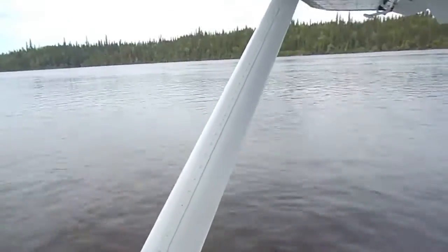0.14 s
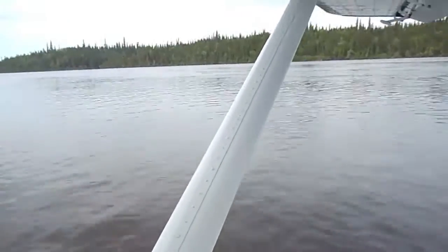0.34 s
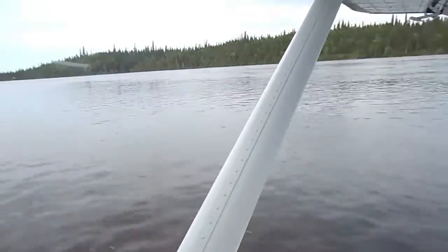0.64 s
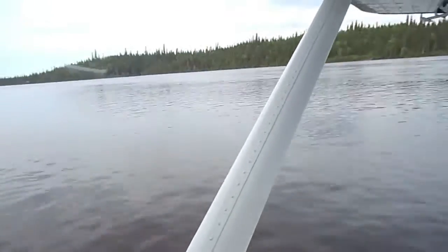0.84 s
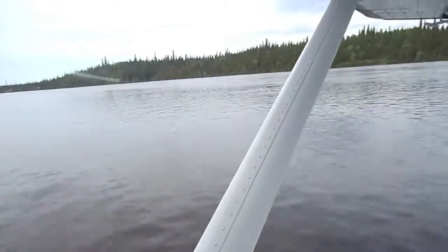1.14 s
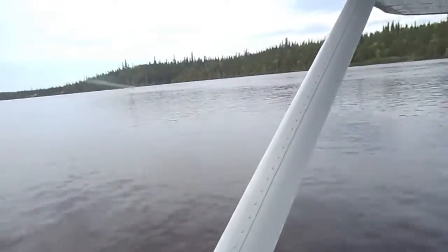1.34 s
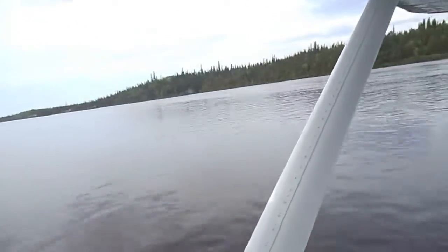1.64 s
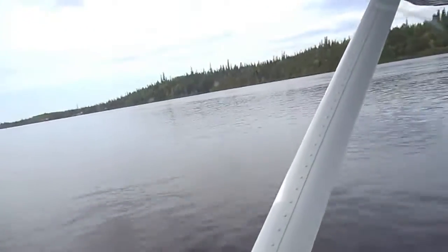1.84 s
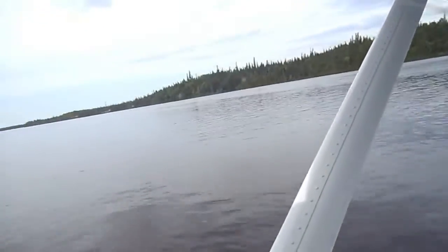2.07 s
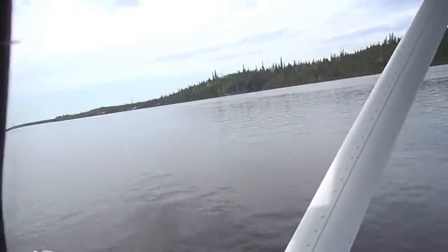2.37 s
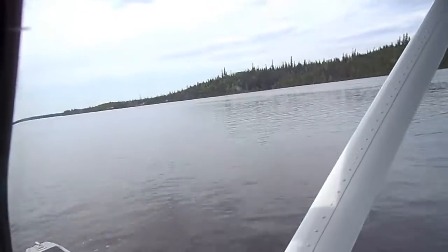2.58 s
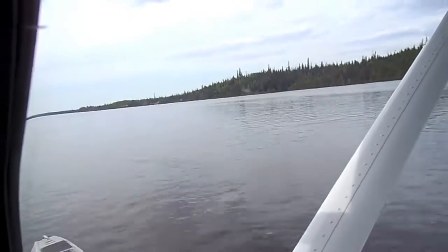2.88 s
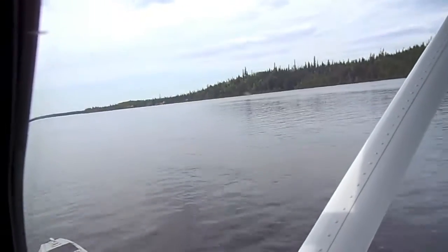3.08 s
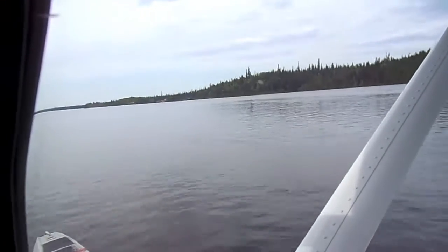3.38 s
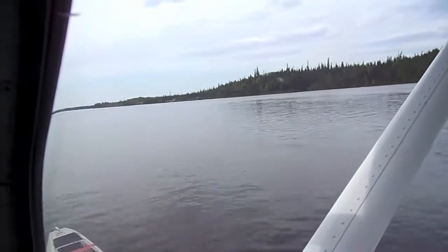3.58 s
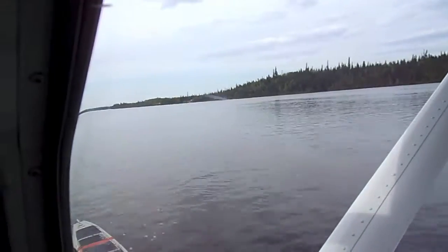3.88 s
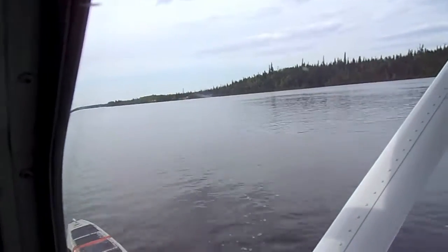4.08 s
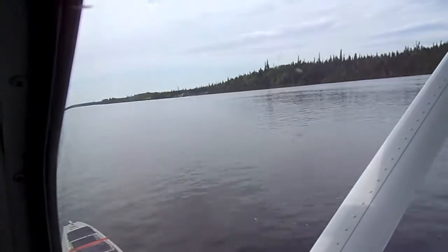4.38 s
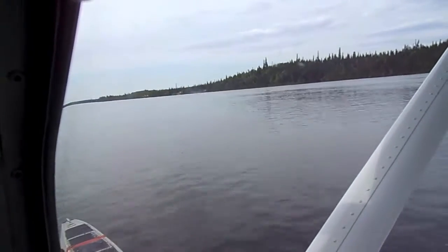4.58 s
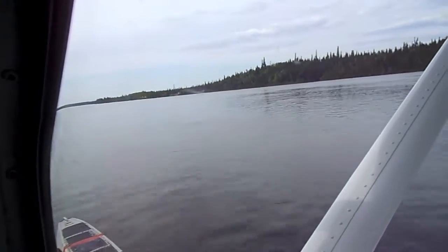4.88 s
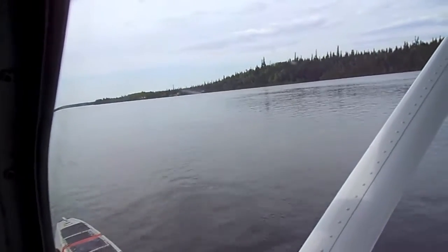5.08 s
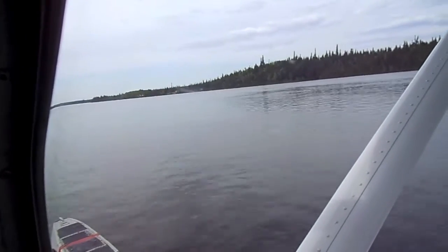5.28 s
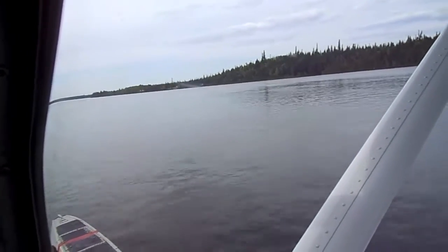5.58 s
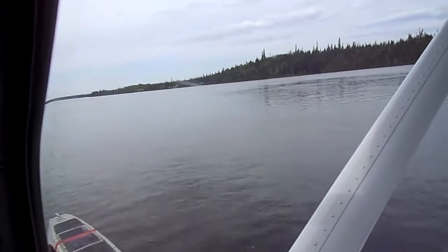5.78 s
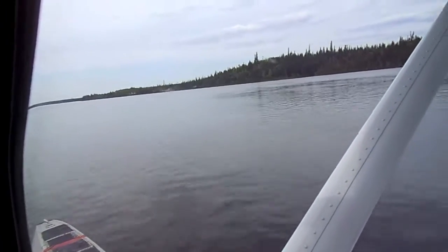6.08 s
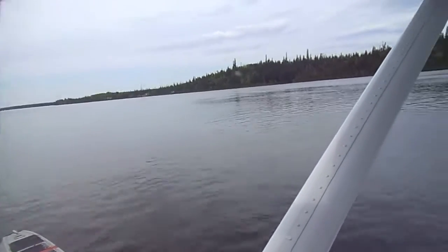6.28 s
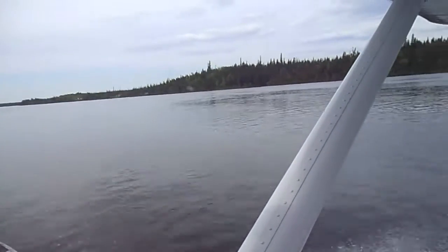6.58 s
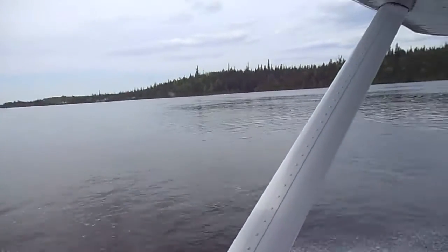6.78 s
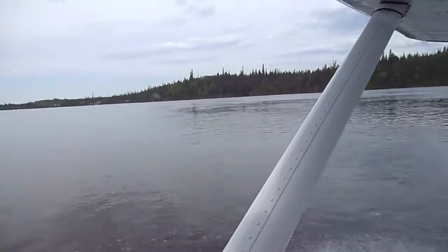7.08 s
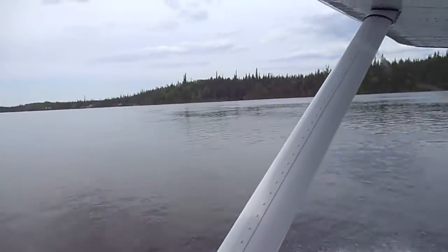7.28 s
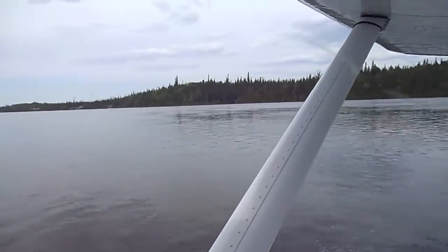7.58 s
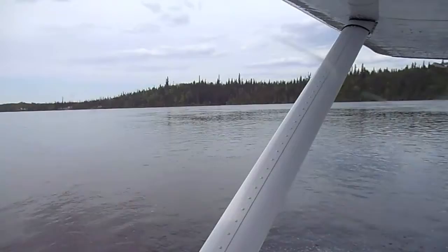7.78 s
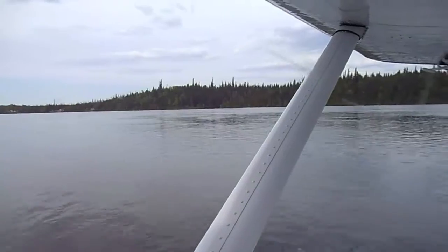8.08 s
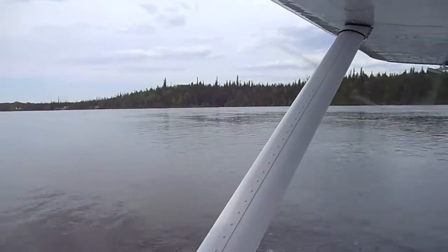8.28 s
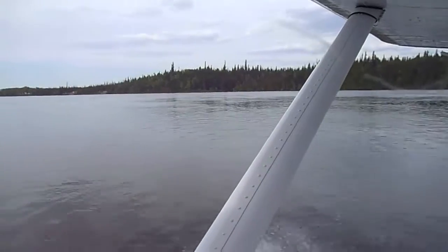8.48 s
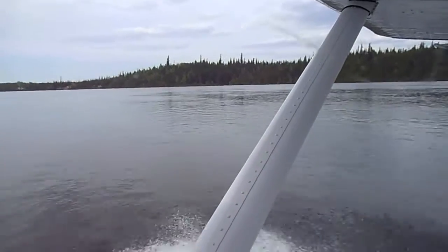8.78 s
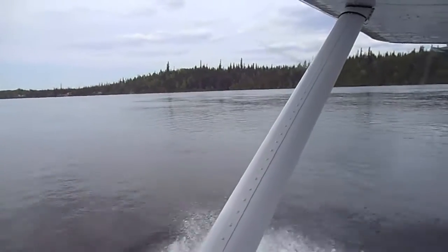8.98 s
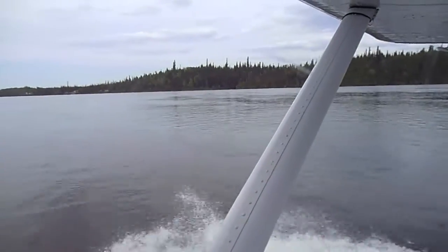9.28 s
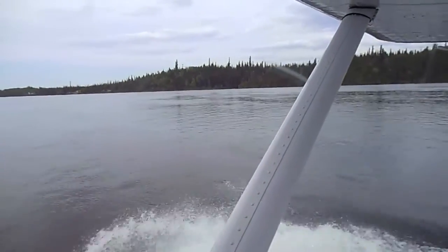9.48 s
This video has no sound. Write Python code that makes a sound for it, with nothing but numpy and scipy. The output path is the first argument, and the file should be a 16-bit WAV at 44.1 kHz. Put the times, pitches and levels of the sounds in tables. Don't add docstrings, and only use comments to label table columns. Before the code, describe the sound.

Inside a small floatplane cabin, a deep radial engine drone slows to idle amid thumping wind, airy hiss, and scattered ticks as it settles on water.

```python
import sys
import numpy as np
from scipy import signal
from scipy.fft import rfft, irfft, next_fast_len
from scipy.io import wavfile
from scipy.ndimage import uniform_filter1d, map_coordinates

SR = 44100
rng = np.random.default_rng(int(sys.argv[2]) if len(sys.argv) > 2 else 0)


def unload_wav(signal):
    wavfile.write(
        sys.argv[1],
        SR,
        np.round(np.clip(np.atleast_2d(signal).T, -1, 1) * 32767).astype(np.int16),
    )


def linear_from_db(decibels):
    return 10 ** (np.asarray(decibels, float) / 20)


N = 425120
TIME_S = np.arange(N) / SR


def unit(x):
    return x / np.sqrt(np.mean(x ** 2) + 1e-20)


def curves(rows):
    s, *cols = np.transpose(rows)
    return [np.interp(TIME_S, s, c) for c in cols]


def wobble(rate_hz):
    knots = rng.standard_normal(int(N * rate_hz / SR) + 4)
    return map_coordinates(knots, [np.arange(N) * rate_hz / SR])


def rush(spectrum, patchy_db):
    z = signal.stft(rng.standard_normal(N + 1024), nperseg=512)[2]
    field = uniform_filter1d(rng.standard_normal(z.shape), size=8, axis=0)
    field = uniform_filter1d(field, size=10, axis=1)
    x = signal.istft(z * linear_from_db(patchy_db * unit(field)), nperseg=512)[1]
    m = next_fast_len(len(x))
    hz, db = np.transpose(spectrum)
    log_hz = np.log(np.fft.rfftfreq(m, 1 / SR) + 1)
    gain = linear_from_db(np.interp(log_hz, np.log(hz + 1), db, left=-120, right=-120))
    return unit(irfft(rfft(x, m) * gain, m)[:N])


def afloat():
    touch_s, settle_s = 5.77, 2.5
    return np.clip((TIME_S - touch_s) / settle_s, 0, 1)


# time in seconds, engine cycles per second.
ENGINE_SPEED = [(0.0, 11.894), (0.4, 11.571), (0.8, 11.219), (1.1, 10.56), (1.5, 9.864), (2.0, 9.334),
                (2.5, 8.97), (3.1, 8.737), (3.8, 8.579), (5.0, 8.484), (5.6, 8.425), (6.2, 8.347),
                (6.8, 8.342), (7.4, 8.289), (8.0, 8.266), (8.6, 8.283), (9.64, 8.255)]


def crank():
    speed, = curves(ENGINE_SPEED)
    return speed, 2 * np.pi * np.cumsum(speed) / SR


# centre in Hz, width in Hz, gain in dB.
HULL_MODES = [(41.9, 5.6, 1.5), (56.7, 4.2, 4.2), (78.0, 14.4, 5.2), (94.7, 43.3, 3.4), (117.8, 9.0, 2.2),
              (128.7, 15.7, 3.6), (149.9, 1.9, -6.3), (159.6, 9.7, -6.3), (138.6, 45.6, 1.2),
              (215.4, 22.0, -24.4)]


def hull_db(hz):
    f = np.arange(10, 400, .25)
    gain = 0
    for k, (centre, width, db) in enumerate(HULL_MODES):
        damping = 1j * f * width
        gain = gain + (-1) ** k * linear_from_db(db) * damping / (centre * centre - f * f + damping)
    return np.interp(hz, f, 20 * np.log10(np.abs(gain)))


# order, idle level in dB, change under power in dB, change once afloat in dB.
ENGINE_ORDERS = [(3, -11, -14, -2), (4, -15, -3, 2), (5, -36, -2, 5), (6, -33, -3, 4), (7, -27, 1, 4),
                 (8, -35, 6, 14), (9, -14, -6, -2), (10, -32, 5, -17), (11, -23, 1, -4), (12, -30, -5, -6),
                 (13, -26, -19, -6), (14, -31, -5, -4), (15, -33, 11, 1), (16, -26, 13, 0), (17, -31, 3, 1),
                 (18, -22, 16, 2), (19, -21, 8, -4), (20, -15, -6, 3), (21, -28, -2, 6), (22, -15, -4, 5),
                 (23, -19, 16, 8), (25, -13, 5, 4), (26, -15, 8, 2), (27, -10, 0, 8), (28, -9, 5, -4),
                 (29, -6, 2, -1), (33, -8, -6, 5)]


def engine(speed, angle):
    cylinders, engine_db = 9, -0.35
    power_from_per_s, power_span_per_s = 9.3, 1.7
    bow_wave_s, damped_hz, damped_width_hz, damp_db_per_s = 9.12, 140, 22, 20

    def tone(order, db, lag):
        return np.sqrt(2) * linear_from_db(db) * np.cos(order * angle - lag)

    def hull_lag(order):
        cubic = np.polyval((-.005, 1.22983, 4.5045, .09), order)
        return cubic + 4.904 * (order % 2) + .15 * wobble(.7)

    power = np.clip((speed - power_from_per_s) / power_span_per_s, 0, 1)
    wet = afloat()
    plough_s = np.clip(TIME_S - bow_wave_s, 0, None)
    out = 0
    for k, idle_db, power_db, wet_db in ENGINE_ORDERS:
        level_db = engine_db + idle_db + hull_db(k * speed) + power_db * power + wet_db * wet
        in_panel = np.exp(-((k * speed[-1] - damped_hz) / damped_width_hz) ** 2)
        level_db = level_db - damp_db_per_s * plough_s * in_panel
        uneven = k % cylinders > 0
        out = out + tone(k, level_db + (.4 + .8 * uneven) * wobble(1.5), hull_lag(k))

    gear, fan = 16 * cylinders, 12 * cylinders
    loaded_db, unloaded_drop_db = -64, 24
    loaded = linear_from_db(loaded_db - unloaded_drop_db * (1 - wet))
    case_hz, case_width_hz = 1313, 76
    casing = linear_from_db(-59.5) * np.exp(-((gear * speed - case_hz) / case_width_hz) ** 12)
    out = out + (casing + loaded) * tone(gear, 1.5 * wobble(4.1), .9 * wobble(4))
    return out + (linear_from_db(-82) + loaded) * tone(fan, 2.5 * wobble(11), 1.3 * wobble(4))


# time in seconds, level in dB.
GUSTS = [(0, 4), (.55, -3), (1.15, 1), (1.5, 1), (1.85, -1.5), (2.6, 0.5), (3.35, -0.5), (3.6, 3),
         (4.1, 0.5), (5.6, 1.5), (6.4, 1.5), (7.1, 2), (7.5, 2.7), (7.8, -2.5), (8.2, 1), (8.8, 4.2),
         (9.05, 1.5), (9.64, 4)]
# frequency in Hz, density in dB per Hz.
THUMP_SPECTRUM = [(5, -16), (11, -5), (28, 0), (44, -3), (61, -2), (77, -5), (92, -4), (100, -14),
                  (130, -40)]
# frequency in Hz, density in dB per Hz.
DRUM_SPECTRUM = [(75, -30), (92, -3), (100, 2), (112, 0), (143, 0), (176, -2), (209, -6), (228, -12),
                 (250, -20), (300, -40)]


def buffet(angle):
    gust_db, = curves(GUSTS)
    thump_db, waves_db, drum_db, drum_grows = -21, -1.2, -26, 1.4
    lull_db = 1.5 * np.exp(-((TIME_S - 4.4) / 0.94) ** 2)
    thump = linear_from_db(thump_db + gust_db + waves_db * afloat() - lull_db) * rush(THUMP_SPECTRUM, patchy_db=1.65)
    wash = unit(linear_from_db(2.3 * np.cos(2 * angle - 1.5)))
    spin_db = -3.5 * np.exp(-(TIME_S / 0.71) ** 4)
    drum = linear_from_db(drum_db + drum_grows * gust_db + spin_db) * rush(DRUM_SPECTRUM, patchy_db=0.2)
    return thump + wash * drum


# time in seconds, level in dB.
WINDOW_FLOW = [(0, -3), (.6, -4), (.85, -2.5), (3.2, .5), (3.7, 3.5), (4.68, -1.7), (5.39, 1.3), (5.5, 0),
               (6.0, -.2), (6.4, 0.6), (6.7, -0.5), (7.36, 0.5), (8.06, -1), (8.65, 2), (8.9, 1.7),
               (9.4, 1.6), (9.64, -0.3)]
# frequency in Hz, density in dB per Hz.
ROAR_SPECTRUM = [(140, -16.5), (230, -6.5), (244, -3), (329, -6.5), (358, -10.5), (444, -12), (542, -15.5),
                 (599, -15), (786, -18.5), (988, -25), (1220, -24.5), (1540, -27), (2360, -27.5),
                 (3280, -35), (7000, -48), (9100, -71), (15400, -120)]
# frequency in Hz, density in dB per Hz.
HISS_SPECTRUM = [(250, -27), (500, -14), (750, -7.5), (1250, -2.5), (2000, -6.5), (3200, -5), (4500, -2.5),
                 (7000, -2), (9000, -3.5), (10500, -1), (11700, 2), (13000, 0), (14400, -4.5)]


def air(angle):
    flow_db, = curves(WINDOW_FLOW)
    airspeed_db = 1.6 * np.exp(-(TIME_S / 3.1) ** 4)
    roar_db = -37 + 0.41 * flow_db + airspeed_db
    hiss_db = -53.5 + flow_db
    gust = wobble(11)
    roar_db = roar_db + .5 * gust + 0.12 * np.cos(2 * angle)
    roar = linear_from_db(roar_db) * rush(ROAR_SPECTRUM, patchy_db=0.59)
    flutter_db = 0.31 * gust + 0.69 * np.cos(2 * angle + 1.7) + 0.33 * wobble(27)
    shared = rush(HISS_SPECTRUM, patchy_db=1.3)
    ports = np.array([rush(HISS_SPECTRUM, patchy_db=0.6), rush(HISS_SPECTRUM, patchy_db=3.2)])
    hiss = linear_from_db(hiss_db + flutter_db + [[-.55], [.55]]) * unit(ports + .5 * shared)
    lean_db = 0.11 * wobble(40)
    return roar * linear_from_db([lean_db, -lean_db]) + hiss


# time in seconds, peak in dB, crack over the ring in dB.
KNOCKS = [
    (0.651, -41.5, -2),
    (4.009, -28.5, -1),
    (4.269, -38, 5),
    (5.066, -39, -3),
    (5.379, -41, -1.5),
    (6.051, -30, -3),
    (7.079, -35, -5),
    (7.159, -38, -2),
    (7.624, -49, 0),
    (8.3, -37, -1),
]
# frequency in Hz, level in dB, decay by 60 dB in seconds.
FITTING_MODES = [(770, 0, .06), (1140, -5.5, 0.085), (1290, -5, .05), (1760, -3, .04), (2400, -9, 0.028)]
# frequency in Hz, density in dB per Hz.
CRACK_SPECTRUM = [(400, 11), (1200, 5.5), (2800, 2), (4500, 1), (6200, -6), (8000, -25)]


def knocks():
    ring, bursts = np.zeros(N + SR), np.zeros(N + SR)
    t = np.arange(SR // 4) / SR
    rise = 1 - np.exp(-t / 0.0044)
    for s, db, crack_db in KNOCKS:
        modes = 0
        for hz, mode_db, t60_s in FITTING_MODES:
            decay = linear_from_db(mode_db + rng.normal(0, 1.5) - 60 * t / t60_s)
            modes = modes + decay * np.sin(2 * np.pi * hz * t)
        start = round(s * SR)
        ring[start:][:len(t)] += linear_from_db(db - 2) * modes * rise
        bursts[start:][:len(t)] += linear_from_db(db + crack_db - 7.0 - 60 * t / 0.083) * rise
    return ring[:N] + bursts[:N] * rush(CRACK_SPECTRUM, patchy_db=2.5)


def squeak():
    start_s, peak_db, rise_s, t60_s = 6.075, -57.5, .006, 1.2
    since_s = np.clip(TIME_S - start_s, 0, None)
    level = (1 - np.exp(-since_s / rise_s)) * linear_from_db(peak_db - 60 * since_s / t60_s + 1.2 * wobble(30))
    return level * np.sin(2 * np.pi * 4000 * TIME_S + .3 * wobble(40))


# time in seconds, level in dB, length in seconds.
SPRAY_PUFFS = [
    (7.162, -58, .03),
    (7.34, -55, .03),
    (7.52, -54, .04),
    (9.103, -52, 0.027),
    (9.17, -57, .025),
    (9.35, -60, .03),
]


def spray():
    puffs = sum(linear_from_db(db) * np.exp(-2 * ((TIME_S - s) / length_s) ** 2) for s, db, length_s in SPRAY_PUFFS)
    fine = [(5000, -22), (9500, -12), (11000, 0), (12500, -3), (14000, -12)]  # (Hz, dB per Hz)
    return puffs * np.array([rush(fine, patchy_db=2.5), rush(fine, patchy_db=-1.0)])


def scene():
    speed, angle = crank()
    drone = engine(speed, angle) + buffet(angle)
    lean_db = .04 + .15 * wobble(12)
    return drone * linear_from_db([lean_db, -lean_db]) + air(angle) + knocks() + squeak() + spray()


def roll_off(x):
    return signal.sosfilt(signal.butter(12, 14240, fs=SR, output="sos"), x)


def record(dry):
    rounded = dry / (1 + np.abs(dry / 1.4) ** 6) ** (1 / 6)
    return roll_off(rounded)


dry = scene()
out = record(dry)
unload_wav(out)
```